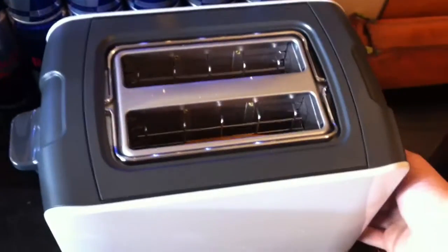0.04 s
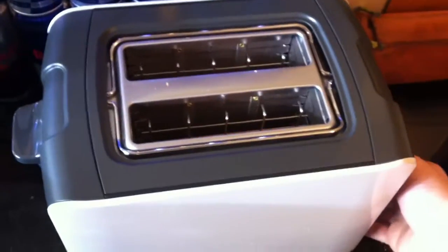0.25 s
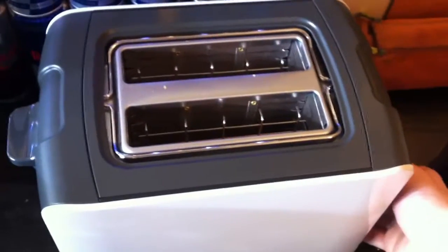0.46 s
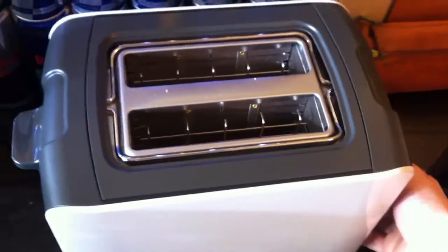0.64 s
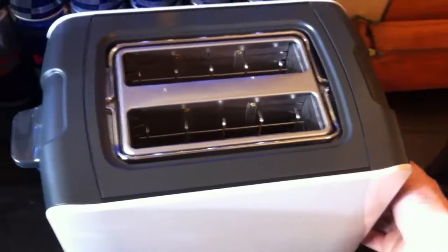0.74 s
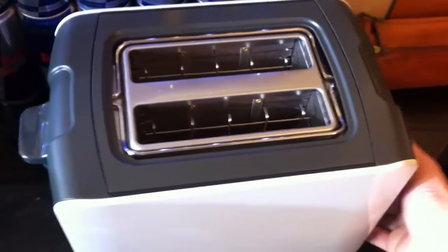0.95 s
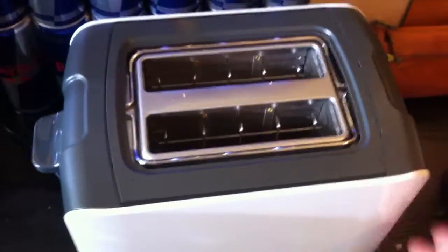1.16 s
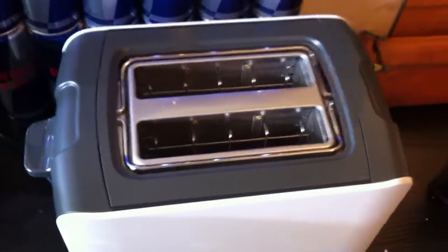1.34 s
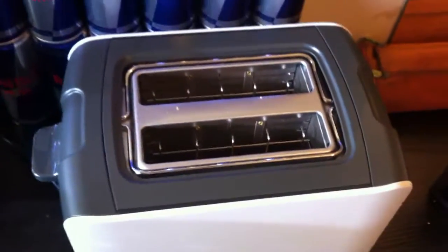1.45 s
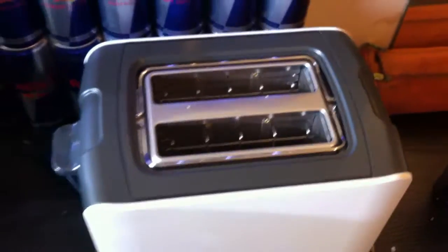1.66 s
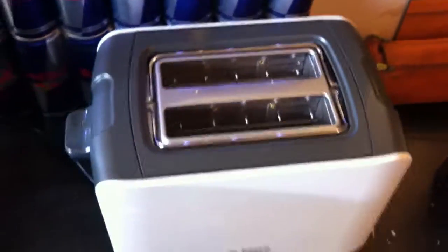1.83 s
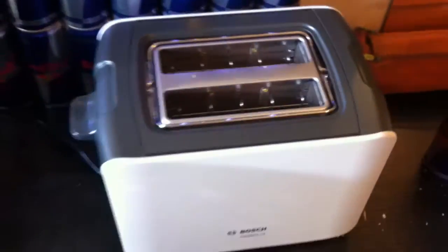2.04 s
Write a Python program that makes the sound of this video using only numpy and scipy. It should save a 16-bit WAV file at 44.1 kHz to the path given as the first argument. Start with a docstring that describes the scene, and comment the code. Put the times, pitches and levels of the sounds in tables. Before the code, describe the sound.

A toaster lever is pushed down close by, scraping and squeaking faintly before it hits the stop with a sharp clack at about 0.25 seconds, briefly ringing and rattling the housing. A duller, weaker knock comes at 0.8 seconds and a soft bump at 1 second. Very faint handling rustles from about 1.7 seconds, over quiet kitchen room noise with a barely audible whine.

```python
"""A toaster, close by on a kitchen counter. Its lever scrapes and squeaks along the guide, then hits
the stop with a sharp double clack that rings the housing and shakes the loose parts inside.
Half a second later the case gives a duller knock. A soft bump and a brief rustle of handling
follow, over quiet room noise with a faint whine."""
import sys
import numpy as np
from scipy import signal
from scipy.fft import rfft, irfft
from scipy.io import wavfile
from scipy.ndimage import uniform_filter1d

SR = 44100
rng = np.random.default_rng(int(sys.argv[2]) if len(sys.argv) > 2 else 0)


def transcribe(u):
    """Save the signal u as a 16-bit wav file named by the first command-line argument.

    u: samples, shape (n,) or (channels, n), limited to [-1, 1]; the rate is SR.
    q: integer samples, one column per channel.
    """
    v = np.clip(np.atleast_2d(u).T, -1, 1)
    q = np.round(v * 32767).astype(np.int16)
    wavfile.write(sys.argv[1], SR, q)


N = 92610

# Blows on the case. Each row: start in seconds, level of the ring and clatter in dB,
# their brightness in dB per octave, level of the low thud in dB.
BLOWS = [(0.2479, -6.5, .8, -33), (.2530, -3, -1, 2), (.378, -28.5, -8, -15.5), (0.7809, -20, -3, -4)]
SHARP_RISE_S, THUD_RISE_S = 0.00052, 0.005


def amp(db):
    """Turns decibels into a gain."""
    return 10 ** (np.asarray(db) / 20)


def unit(x):
    """Scales a signal to an average power of 1."""
    return x / np.sqrt(np.mean(x ** 2) + 1e-20)


def die_away(t, ring_s):
    """A fade that drops 60 dB over the ring time."""
    return np.exp(-np.log(1000) * t / ring_s)


def read(points, hz):
    """Looks up values between a table's rows, with frequency spaced by octaves."""
    freqs, values = np.transpose(points)
    return np.interp(np.log(hz + 1), np.log(freqs + 1), values)


def add(mix, start, sound):
    """Mixes a sound in at a start time in seconds."""
    part = mix[max(round(start * SR), 0):][:len(sound)]
    part += sound[:len(part)]


def colour(x, points, tilt_db=0):
    """Shapes the tone of a noise; a tilt above zero makes it brighter."""
    hz = np.fft.rfftfreq(len(x), 1 / SR)
    gain = amp(read(points, hz) + tilt_db * np.log2(hz / 1000 + .1))
    return unit(irfft(rfft(x) * gain, len(x)))


def even_noise(count):
    """Noise that is equally strong at every frequency."""
    return unit(irfft(np.exp(2j * np.pi * rng.random(count // 2 + 1)), count))


def narrow(hz, width_hz):
    """Noise squeezed around one pitch, heard as a wavering tone."""
    freqs = np.fft.rfftfreq(N, 1 / SR)
    return unit(irfft(rfft(even_noise(N)) / (1 + ((freqs - hz) / width_hz) ** 2), N))


def ring(tones, tilt_db=0):
    """The fading tones of a struck object."""
    t, out = np.arange(SR) / SR, np.zeros(SR)
    for hz, db, ring_s in tones:
        level = amp(db + tilt_db * np.log2(hz / 1000))
        out += level * die_away(t, ring_s) * np.sin(2 * np.pi * (hz * t + rng.random()))
    return out


def slips(per_second=5000, spread_db=3):
    """Rubbing surfaces catch and slip in many tiny, uneven clicks."""
    size = amp(spread_db * np.minimum(rng.exponential(1, N), 4))
    return size * rng.choice([-1., 1.], N) * (rng.random(N) < per_second / SR)


def room_noise(level_db=-66.5, flicker_db=1.7):
    """A quiet, slightly flickering rush."""
    # Tone of the rush. Each row: frequency in Hz, relative level in dB.
    air_tone = [(25, -19), (60, -23), (95, -9.5), (140, -3), (230, -1), (430, 2.5), (650, -4.5),
                (1000, -3.5), (2000, -4.5), (3200, -11.5), (6000, -15), (10000, -18), (15500, -16.5)]
    bands = signal.stft(colour(even_noise(N), air_tone), nperseg=1024)[2]
    patches = uniform_filter1d(rng.standard_normal(bands.shape), size=8, axis=0)  # smooth over pitch
    patches = unit(uniform_filter1d(patches, size=4, axis=1))  # and over time
    return amp(level_db) * signal.istft(bands * amp(flicker_db * patches))[1][:N]


def whine(hz=1046, roughness=0.35):
    """A thin, slightly rough tone that fades away and comes back."""
    # Loudness of the whine. Each row: time in seconds, level in dB.
    levels = [(0, -68.5), (.5, -73.5), (.95, -73), (1.15, -74.5), (1.4, -92), (1.75, -78.5), (2.1, -75.5)]
    t = np.arange(N) / SR
    tone = unit(np.sin(2 * np.pi * hz * t) + roughness * narrow(hz, width_hz=6.9))
    return amp(np.interp(t, *np.transpose(levels))) * tone


def drone():
    """A faint, low, wavering hum."""
    return amp(-74) * narrow(hz=180.4, width_hz=14.7)


def lever_scrape(rise_s=0.015, fade_s=0.012):
    """The lever rubs along its guide in short strokes; the fast ones hiss."""
    # Lever strokes. Each row: start in seconds, length in seconds, rub in dB, hiss in dB.
    strokes = [(0.043, 0.053, -53.5, -71.5), (0.118, 0.025, -55, -81), (0.155, 0.033, -54, -55.5),
               (0.188, 0.034, -55, -63), (0.225, 0.025, -51.5, -55)]
    # Tone of the rub and of the hiss. Each row: frequency in Hz, relative level in dB.
    rub_tone = [(50, -25), (100, -20), (140, 4), (300, 0.5), (650, -5.5), (1050, -3), (1700, -1.5),
                (2600, -4.5), (4200, -19.5), (9000, -26), (16000, -42)]
    hiss_tone = [(200, -23), (1500, -4), (2900, -2.5), (4500, -3), (6800, 1), (10200, -9.5), (13500, 2),
                 (16000, -7)]
    t, out = np.arange(N) / SR, np.zeros(N)
    rub, hiss = colour(slips(), rub_tone), colour(slips(), hiss_tone)
    for start, length, rub_db, hiss_db in strokes:
        swell = np.clip((t - start) / rise_s, 0, 1)
        fade = np.exp(-np.maximum(t - start - length, 0) / fade_s)
        out += swell * fade * (amp(rub_db) * rub + amp(hiss_db) * hiss)
    return out


def lever_squeaks():
    """The moving lever sticks and slips, making brief tones."""
    # Squeaks. Each row: start in seconds, length in seconds, pitch in Hz, level in dB.
    squeaks = [(0.163, .045, 2830, -54), (0.183, 0.085, 313, -56.5)]
    t, out = np.arange(N) / SR, np.zeros(N)
    for start, length, hz, db in squeaks:
        swell = np.sin(np.pi * np.clip((t - start) / length, 0, 1))
        out += amp(db) * swell * narrow(hz, width_hz=33)
    return out


def spring_shiver():
    """The return spring gives a thin, high, wavering tone that slowly fades."""
    t, out = np.arange(N) / SR, np.zeros(N)
    shiver = amp(-69) * die_away(t, ring_s=0.93) * narrow(hz=6730, width_hz=70)
    add(out, start=0.21, sound=shiver)
    return out


def lever_clacks():
    """Each time the lever touches its stop, it makes a hard, very short crack."""
    # Hits on the stop. Each row: start in seconds, level in dB, pitch in Hz, ring time in seconds.
    contacts = [(.2475, -21.5, 1780, 0.0097), (0.2478, -33.5, 4140, 0.0047), (.2493, -19, 1940, 0.0029),
                (0.2524, -15.5, 2440, 0.0065), (0.2555, -25.5, 2180, 0.0067), (.7813, -37.5, 2160, 0.0089),
                (.7822, -52, 8200, 0.0033)]
    t, out = np.arange(2048) / SR, np.zeros(N)
    for start, db, hz, ring_s in contacts:
        rise = np.minimum(2 * hz * t, 1)  # takes half a cycle
        add(out, start, amp(db) * rise * die_away(t, ring_s) * np.sin(2 * np.pi * hz * t))
    return out


def rattle(clatter_db=-27, thump_db=-36):
    """Each blow shakes the loose parts at once; the feet thump the counter a little later."""
    # Tone of the clatter and of the thump. Each row: frequency in Hz, relative level in dB.
    clatter_tone = [(25, -28), (100, -35), (300, -25), (500, -8.5), (760, -9), (1100, -1.5), (1800, 0.5),
                    (2800, -4.5), (4200, -12), (7000, -19.5), (10000, -26), (13500, -23.5), (16000, -28)]
    thump_tone = [(25, -17), (90, -23), (135, -2.5), (240, -2.5), (480, 3), (650, -0.5), (800, -3),
                  (1500, -29), (5000, -62)]
    t, out = np.arange(SR) / SR, np.zeros(N)
    burst = (1 - np.exp(-t / SHARP_RISE_S)) * die_away(t, ring_s=0.076)
    push = (1 - np.exp(-t / THUD_RISE_S)) ** 2 * die_away(t, ring_s=0.088)
    for start, db, tilt_db, thud_db in BLOWS:
        # Short pieces of noise keep even a brief burst full in tone.
        shake = np.concatenate([even_noise(490) for _ in range(SR // 490)])
        add(out, start, amp(clatter_db + db) * burst * colour(shake, clatter_tone, tilt_db))
        add(out, start, amp(thump_db + thud_db) * push * colour(even_noise(SR), thump_tone))
    return out


def case_ring():
    """Each blow rings the housing; the low thud of the rocking case builds more slowly."""
    # Tones of the housing and of the case rocking on the counter.
    # Each row: pitch in Hz, relative level in dB, ring time in seconds.
    housing_tones = [(946, -48, 0.17), (1032, -50.5, 0.24), (1220, -38.5, 0.2), (1509.5, -40.5, 0.26),
                     (1628, -34.5, 0.14), (1676, -43.5, 0.28), (1895, -36, 0.2), (2200, -65, .26),
                     (2512, -46.5, 0.2), (2735, -42, 0.15), (3070, -45, 0.14)]
    thud_tones = [(133.9, -51, 0.36), (153.9, -48, 0.32), (215, -59.5, 0.33), (298.6, -43.5, 0.22),
                  (325, -50.5, 0.23), (436, -46.5, 0.35), (462, -37, 0.13), (574, -48.5, 0.16),
                  (620.7, -42.5, .11)]
    t, out = np.arange(SR) / SR, np.zeros(N)
    fast_rise = 1 - np.exp(-t / SHARP_RISE_S)
    slow_rise = (1 - np.exp(-t / THUD_RISE_S)) ** 2
    for start, db, tilt_db, thud_db in BLOWS:
        add(out, start, amp(db) * fast_rise * ring(housing_tones, tilt_db))
        add(out, start, amp(thud_db) * slow_rise * ring(thud_tones))
    return out


def soft_bump(start=1, rise_s=0.0094):
    """A gentle bump rings only the low tones of the case."""
    # Tones of the bump. Each row: pitch in Hz, level in dB, ring time in seconds.
    bump_tones = [(187, -63.5, 0.42), (304.3, -54.5, 0.29), (373, -52, 0.08), (432, -52.5, 0.22)]
    t, out = np.arange(SR) / SR, np.zeros(N)
    add(out, start, (1 - np.exp(-t / rise_s)) * ring(bump_tones))
    return out


def handling_rustle():
    """Handling makes a faint rubbing noise that swells and fades."""
    # Rustles. Each row: start in seconds, rise in seconds, fade in seconds, level in dB.
    rustles = [(1.66, 0.052, 0.15, -72), (1.863, 0.011, 0.072, -63)]
    # Tone of the rustle. Each row: frequency in Hz, relative level in dB.
    rustle_tone = [(100, -26), (500, 1), (1100, 5), (3000, 3.5), (5000, -5.5), (9000, -12), (16000, -26)]
    t, level = np.arange(N) / SR, np.zeros(N)
    for start, rise_s, fade_s, db in rustles:
        swell = np.clip((t - start) / rise_s, 0, 1)
        fade = np.exp(-np.maximum(t - start - rise_s, 0) / fade_s)
        level += amp(db) * swell * fade
    return level * colour(slips(), rustle_tone)


def kitchen_echo(x, level_db=-2.5, delay_s=0.009, echoes_per_second=3000):
    """The kitchen throws back many small echoes; each frequency dies at its own speed."""
    # Curve of the echo's length. Each row: frequency in Hz, ring time in seconds.
    ring_times = [(120, 1.25), (320, -0.04), (840, 0.59), (2200, .37), (5800, 0.53), (14000, 0.25)]
    # Tone of the echo. Each row: frequency in Hz, relative level in dB.
    echo_tone = [(60, -23), (150, 2), (500, -2.5), (1500, -7), (4000, -9.5), (14000, -1)]
    echoes = rng.choice([-1., 1.], SR) * (rng.random(SR) < echoes_per_second / SR)
    hz, t, bands = signal.stft(echoes, SR, nperseg=256)
    fading = bands * die_away(t, read(ring_times, hz)[:, None])
    tail = signal.istft(fading * amp(read(echo_tone, hz))[:, None], SR)[1]
    tail /= np.linalg.norm(signal.istft(fading, SR)[1])
    out = np.zeros(N)
    add(out, delay_s, signal.fftconvolve(x, tail))
    return amp(level_db) * out


def scene():
    """The toaster and its echo over the room noise, in one channel."""
    mechanism = lever_clacks() + rattle() + lever_scrape() + lever_squeaks() + spring_shiver()
    ringing = case_ring() + soft_bump()
    echo = kitchen_echo(mechanism + amp(-8) * ringing)
    return (mechanism + ringing + echo + handling_rustle() + room_noise() + whine() + drone())[None]


def record(dry):
    """Cuts away the very highest treble."""
    low_pass = signal.firwin(801, cutoff=15780, window=("kaiser", 8), fs=SR)
    return signal.oaconvolve(dry, low_pass[None], "same")


dry = scene()
out = record(dry)
transcribe(out)
```